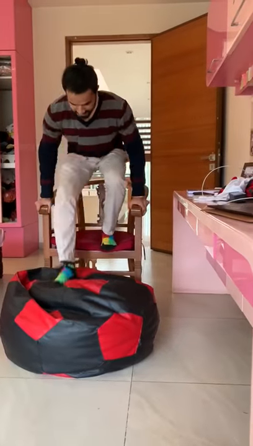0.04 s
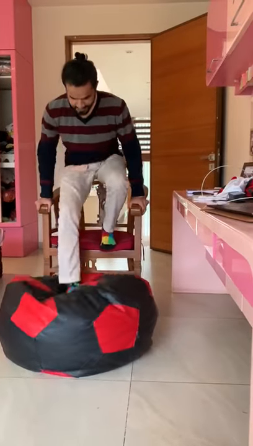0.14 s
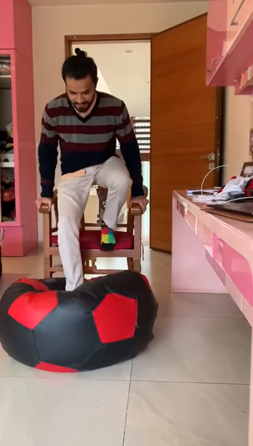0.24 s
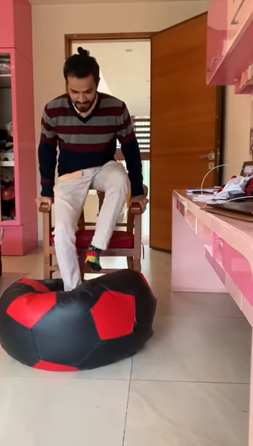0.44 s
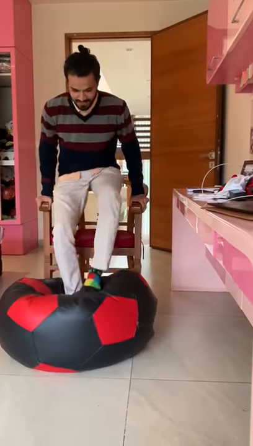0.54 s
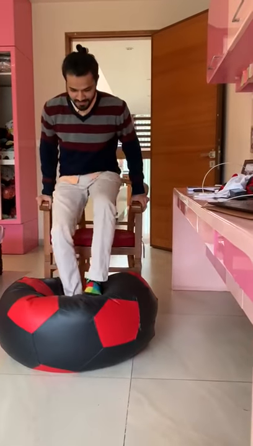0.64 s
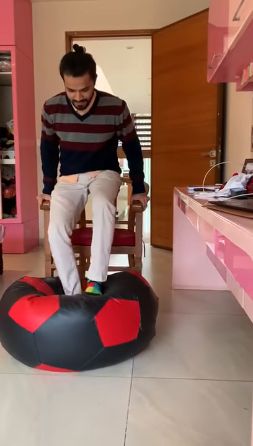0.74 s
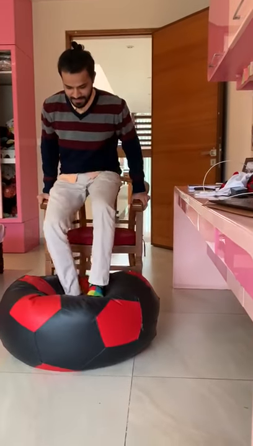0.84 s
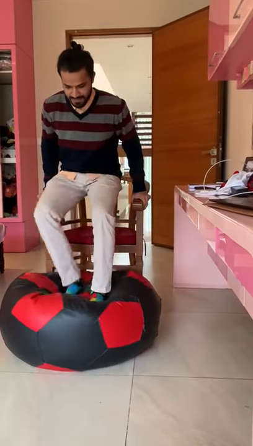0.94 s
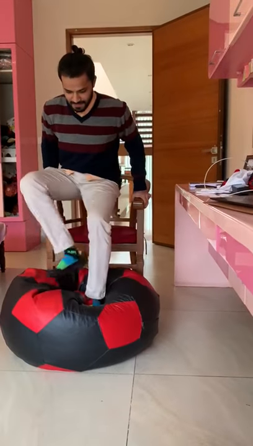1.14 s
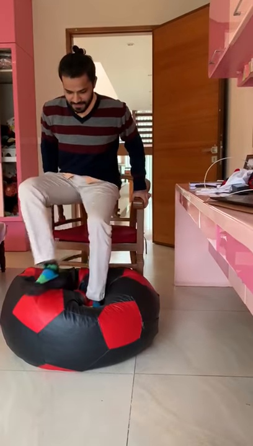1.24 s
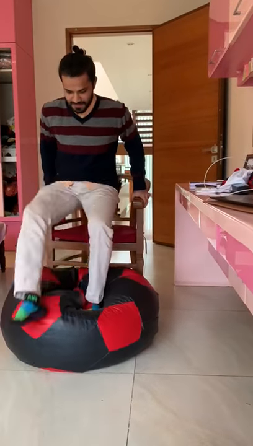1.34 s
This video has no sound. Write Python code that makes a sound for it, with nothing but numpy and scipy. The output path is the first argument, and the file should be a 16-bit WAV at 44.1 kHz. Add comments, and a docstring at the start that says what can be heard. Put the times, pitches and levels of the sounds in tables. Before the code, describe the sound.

A foot steps onto a vinyl bean bag with one thump. A light rustle comes at about 0.1 seconds, then at 0.25 the cover snaps and slaps as the beads crunch, echoing briefly in a tiled room. Much softer rubbing and shifting of the filling follow around 0.5 to 0.7 seconds, near 1.0 and again at 1.4. A low rumble and faint hum continue underneath.

```python
"""A socked foot drops onto a vinyl bean bag: the cover cracks and slaps, the bag thumps and the beads
crunch as they pack. Before and after, feet rub the cover and the filling shifts.
The room is bare and tiled, with a low rumble and a faint hum underneath.
A closely spaced microphone pair hears it all, centred in the bass and wider in the mids."""
import sys
import numpy as np
from scipy import signal
from scipy.fft import rfft, irfft, next_fast_len
from scipy.io import wavfile
from scipy.ndimage import uniform_filter1d, minimum_filter1d

SR = 44100
rng = np.random.default_rng(int(sys.argv[2]) if len(sys.argv) > 2 else 0)


def int16_out(signal):
    """Quantize to a 16-bit WAV file."""
    q = np.round(np.clip(np.atleast_2d(signal).T, -1, 1) * 32767)
    wavfile.write(sys.argv[1], SR, q.astype(np.int16))


N = 61739
STEP_S = 0.245  # the foot lands
BEADS_PER_S, CREASES_PER_S = 5000, 3000

# Reverb time of the tiled room: f/Hz, t60/s
ROOM_DECAY = [(80, 1), (300, 0.84), (550, 0.62), (1000, 0.72), (2000, 0.69), (4000, 0.67), (10000, 0.41)]
# Stereo width, as gain on the side signal: f/Hz, level/dB
MIC_WIDTH = [(60, -30), (180, -25), (350, -8), (600, -2), (1100, 0), (3400, -1.5), (4500, -22), (7000, -24),
             (11000, -16)]
# Lead of the left microphone over the right: f/Hz, phase/rad
MIC_PHASE = [(20, 0), (600, 0), (2100, .9), (3600, 1.2), (4400, 3.1), (5500, 3.2), (5850, 6.2), (7600, 6.4),
             (8200, 9.3), (9500, 9.5), (10100, 12.5)]
# Balance, left minus right: f/Hz, level/dB
MIC_BALANCE = [(190, 0), (350, -2), (620, -4.2), (1100, -1.2), (2000, -.5), (10000, -.3)]
# EQ of the room rumble: f/Hz, level/dB
RUMBLE_EQ = [(20, -15.5), (40, 1), (68, 2.5), (100, -10), (150, -2), (200, -7), (350, -6.5), (520, -13.5),
             (1200, -20.5), (2500, -34), (4500, -37), (8000, -53), (12000, -53)]
# Foot movements: peak t/s, rise/s, fall/s, rub level/dB, swish level/dB, shift level/dB
FOOT_MOVES = [(0.097, 0.0077, 0.033, -63, -59, -73), (0.142, .037, 0.086, -39, -63, -43.5),
              (0.531, 0.086, 0.041, -43.5, -77, -42.5), (0.655, 0.083, 0.048, -45, -57, -47),
              (.925, 0.088, 0.089, -49.5, -69.5, -43), (1.002, 0.056, 0.1, -42.5, -55, -48),
              (1.25, 0.15, 0.083, -54, -84, -58), (1.383, 0.034, 0.068, -48, -52, -45.5)]
# EQ of the rubbed vinyl: f/Hz, level/dB
RUB_EQ = [(80, -8.5), (170, 3), (380, 4.5), (520, -8.5), (750, -0.5), (1200, -0.5), (2000, -4.5),
          (3500, -14), (5000, -25.5), (7000, -25), (9000, -68), (12000, -79)]
# EQ of the sock's airy swish: f/Hz, level/dB
SWISH_EQ = [(500, -14), (2000, -2.5), (4000, 4.5), (6700, 5.5), (8000, -5.5), (11000, -8.5), (12000, -20)]
# EQ of the muffled, shifting beads: f/Hz, level/dB
SHIFT_EQ = [(40, -15.5), (72, 3.5), (105, 1), (150, 0), (210, -2), (270, -1), (370, -0.5), (500, -11.5),
            (1000, -18), (3000, -65)]
# Dull blows as the weight sinks in, the filling locks and the bag settles: t/s, f/Hz, level/dB, half-width/s
BAG_PUSHES = [(0.260, 134.3, -15, 0.011), (0.304, 152.6, -19.5, .009), (0.349, 86, -24, 0.0088)]
# Resonances of bag and room: f/Hz, relative level/dB, t60/s
THUMP_MODES = [(89.15, -13, 1), (118.7, -1, 0.24), (152.1, -9.5, 0.73), (186.9, 0.5, 0.42),
               (309.3, -7.5, 0.89), (363.4, -2, 0.7), (442.3, 0.5, 0.4), (599.3, -4.5, 0.52),
               (670.5, 0, 0.19), (670.4, 6.5, 0.19), (838.5, -3.5, 0.33), (988, -3.5, 0.45),
               (1243, -0.5, 0.26), (1314, -5, 0.33), (2030, 5.5, 0.074)]
# Vinyl folds giving way under the foot: t/s, level/dB
FOLD_CRACKS = [(0.2445, -6), (0.2468, -5)]
# EQ of a fold's bright snap: f/Hz, level/dB
CRACK_EQ = [(300, -10), (1000, -2), (3000, 0), (5000, -4), (7000, -5), (8500, -11), (10500, -18),
            (12000, -32)]
# EQ of the packing beads: f/Hz, level/dB
CRUNCH_EQ = [(40, -27), (80, -14), (130, -3.5), (250, 2), (400, 3), (520, -6), (950, 0), (1600, -5),
             (3400, -13.5), (5000, -31), (7500, -35), (10500, -52), (12000, -68)]
# EQ of the cover's slap: f/Hz, level/dB
SLAP_EQ = [(60, -45), (150, -11.5), (350, 1.5), (500, 1), (720, 7.5), (1000, -2), (1500, -5.5),
           (2100, -7.5), (3700, -11), (5000, -24), (7000, -24.5), (9000, -40), (11000, -39.5), (12000, -48)]


def amp(db):
    """Decibels to gain."""
    return 10 ** (np.asarray(db) / 20)


def lookup(table, hz):
    """Read a curve on a log-frequency axis."""
    points = np.array(table, float)
    return np.interp(np.log(np.maximum(hz, 1)), np.log(points[:, 0]), points[:, 1])


def unit(x):
    """Scale to rms 1."""
    return x / np.sqrt(np.mean(x ** 2))


def eq(x, curve):
    """Minimum-phase EQ of unit power: the curve sets only the tone colour."""
    size = 4096
    cepstrum = irfft(np.log(amp(lookup(curve, np.fft.rfftfreq(size, 1 / SR)))))
    cepstrum[1:size // 2] *= 2
    cepstrum[size // 2 + 1:] = 0
    response = irfft(np.exp(rfft(cepstrum)))
    return signal.fftconvolve(x, response / np.linalg.norm(response))[:N]


def grains(per_s, spread_db):
    """A steady stream of tiny clicks of uneven size."""
    present = rng.random(N) < per_s / SR
    polarity = rng.choice([-1, 1], N)
    sizes = amp(spread_db * np.clip(rng.standard_normal(N), -2, 2))
    return unit(present * polarity * sizes)


def wander(per_s):
    """Random modulation: values joined by straight lines."""
    knots = rng.standard_normal(256)
    return np.interp(np.arange(N) / SR * per_s, np.arange(len(knots)), knots)


def envelope(start, attack, hold, release):
    """Straight rise, hold, exponential release, all in seconds."""
    t = np.arange(N) / SR - start
    return np.clip(t / attack, 0, 1) * np.exp(-np.maximum(t - attack - hold, 0) / release)


def room_tail():
    """Diffuse reverb off the tiles, as mid and side; each octave dies at its own rate."""
    predelay_s, build_s = 0.0063, 0.0023
    size = next_fast_len(N, True)
    t, hz = np.arange(N) / SR, np.fft.rfftfreq(size, 1 / SR)
    noise = rfft(rng.standard_normal((2, size)))
    centres = 62.5 * 2. ** np.arange(9)
    tail = 0
    for centre, weights in zip(centres, np.eye(len(centres))):
        octave = lookup(list(zip(centres, weights)), hz)
        band = irfft(noise * octave, size)[:, :N]
        tail += band * np.exp(-np.log(1000) * t / lookup(ROOM_DECAY, centre))
    return unit(tail * np.clip((t - predelay_s) / build_s, 0, 1)) / np.sqrt(N)


def in_room(x, tail, wet_db):
    """Direct sound from ahead plus reverb, as mid and side."""
    wet = amp(wet_db)
    reverb = signal.fftconvolve(x[None], tail, axes=1)[:, :N]
    return (np.array([x, 0 * x]) + wet * reverb) / np.hypot(1, wet)


def early_reflections(x, side_db, decay_s):
    """Floor and furniture scatter the first milliseconds sideways."""
    scatter = unit(rng.standard_normal(N) * envelope(0, 0.0012, 0, decay_s)) / np.sqrt(N)
    return np.array([0 * x, amp(side_db) * signal.fftconvolve(x, scatter)[:N]])


def microphones(mid_side):
    """Mid and side to left and right: the pair shares the bass; higher up, level and phase differ."""
    size = next_fast_len(N + SR // 20, True)
    hz = np.fft.rfftfreq(size, 1 / SR)
    mid, side = rfft(mid_side, size)
    sign = np.array([[1], [-1]])
    left_right = mid + sign * amp(lookup(MIC_WIDTH, hz)) * side
    balance = amp(sign * lookup(MIC_BALANCE, hz) / 2)
    phase_shift = np.exp(0.5j * sign * lookup(MIC_PHASE, hz))
    return irfft(left_right * balance * phase_shift, size)[:, :N]


def room_tone():
    """The bed: a steady low rumble with a faint, wavering hum in the centre."""
    rumble_db, hum_db, hum_hz, waver_rad = -46.5, -50, 70, 0.4
    phase = 2 * np.pi * hum_hz * np.arange(N) / SR + waver_rad * wander(per_s=6)
    hum = amp(hum_db) * unit(np.sin(phase))
    rumble = amp(rumble_db) * np.array([eq(rng.standard_normal(N), RUMBLE_EQ) for _ in range(2)])
    return rumble + np.array([hum, 0 * hum])


def rustle(tail):
    """Each foot movement creases the cover, slides a sock over it and shifts the beads inside."""
    t = np.arange(N) / SR
    power = np.zeros((3, N))
    for peak, rise, fall, *levels_db in FOOT_MOVES:
        swell = np.exp(-((t - peak) / np.where(t < peak, rise, fall)) ** 2)
        power += amp(levels_db)[:, None] ** 2 * swell
    stick_slip = amp(3.5 * wander(per_s=36))  # the cloth catches as it slides
    rub_gain, swish_gain, shift_gain = np.sqrt(power) * stick_slip
    rub = eq(rub_gain * grains(CREASES_PER_S, spread_db=3), RUB_EQ)
    swish = eq(swish_gain * grains(BEADS_PER_S, spread_db=0.5), SWISH_EQ)
    shift = eq(shift_gain * grains(BEADS_PER_S, spread_db=1.5), SHIFT_EQ)
    return in_room(rub + swish + shift, tail, wet_db=-3)


def pushes(tail):
    """The weight: each dull blow heaves the bag for a few cycles."""
    t = np.arange(N) / SR
    heave = np.zeros(N)
    for peak, hz, db, half_width in BAG_PUSHES:
        swell = np.exp(-((t - peak) / half_width) ** 2)
        heave += amp(db) * swell * np.sin(2 * np.pi * hz * (t - peak))
    return in_room(heave, tail, wet_db=-16)


def thump():
    """The body: the soft landing rings the resonances of bag and room, from ahead and from the sides."""
    level_db, side_db, lag_s, attack_s = -17, -8, 0.00508, 0.0011
    t = np.maximum(np.arange(N) / SR - STEP_S - lag_s, 0)
    ring = np.zeros((2, N))
    for hz, db, t60 in THUMP_MODES:
        phase = 2 * np.pi * (hz * t + rng.random())
        sideways = rng.choice([-1, 1]) * amp(side_db)
        decay = np.exp(-np.log(1000) * t / t60)
        ring += amp(db) * decay * np.array([np.sin(phase), sideways * np.cos(phase)])
    return amp(level_db) * ring * (1 - np.exp(-t / attack_s))


def cracks():
    """The transient: each vinyl fold gives way with one sharp click and a few splinters."""
    force = np.zeros(N)
    for start, db in FOLD_CRACKS:
        click = signal.unit_impulse(N, int(start * SR))
        splinters = amp(-20) * rng.standard_normal(N) * envelope(start, 1 / SR, hold=0, release=0.0006)
        force += amp(db) * (click + splinters)
    return eq(force, CRACK_EQ)


def landing(tail, crack):
    """The hit: the sock grazes, the cover cracks and slaps, and the beads crunch until they lock."""
    graze_db, slap_db, crunch_db, graze_lead_s = -28, -9, -18, 0.02
    brushing = envelope(STEP_S - graze_lead_s, attack=graze_lead_s, hold=0, release=0.0021)
    graze = amp(graze_db) * eq(rng.standard_normal(N) * brushing, RUB_EQ)
    flattening = envelope(STEP_S, attack=0.00048, hold=0.02, release=0.014)
    slap = amp(slap_db) * eq(grains(CREASES_PER_S, spread_db=1) * flattening, SLAP_EQ)
    packing = envelope(STEP_S, attack=0.015, hold=0.063, release=0.012)
    crunch = amp(crunch_db) * eq(grains(BEADS_PER_S, spread_db=2.5) * packing, CRUNCH_EQ)
    hit = graze + crack + slap + crunch
    return in_room(hit, tail, wet_db=-10) + early_reflections(hit, side_db=-3, decay_s=0.0027)


def scene():
    """One heavy step and the shuffling round it; the cracks also arrive dry, dead centre."""
    tail, crack = room_tail(), cracks()
    mid_side = landing(tail, crack) + pushes(tail) + thump() + rustle(tail) + room_tone()
    return microphones(mid_side) + amp(-6) * crack


def record(dry):
    """A fast limiter holds down the highest peaks, then a steep low-pass cuts the top."""
    ceiling, window_s, top_hz = 0.92, 0.004, 11700
    window = int(window_s * SR)
    needed_gain = ceiling / np.maximum(np.abs(dry).max(axis=0), ceiling)
    gain = uniform_filter1d(minimum_filter1d(needed_gain, window), window)
    lowpass = signal.ellip(8, 0.2, 70, top_hz, fs=SR, output="sos")
    return signal.sosfilt(lowpass, dry * gain)


dry = scene()
out = record(dry)
int16_out(out)
```